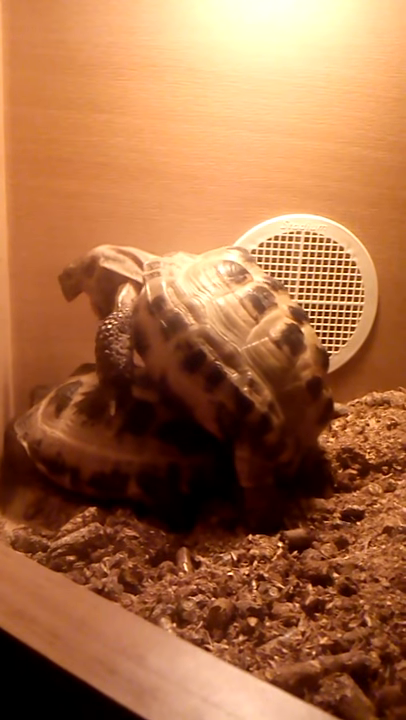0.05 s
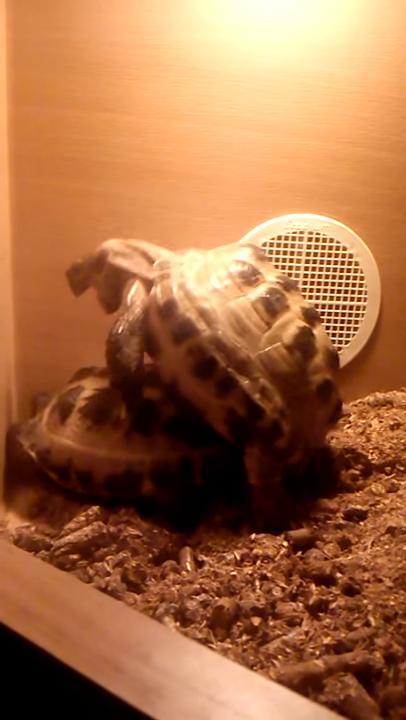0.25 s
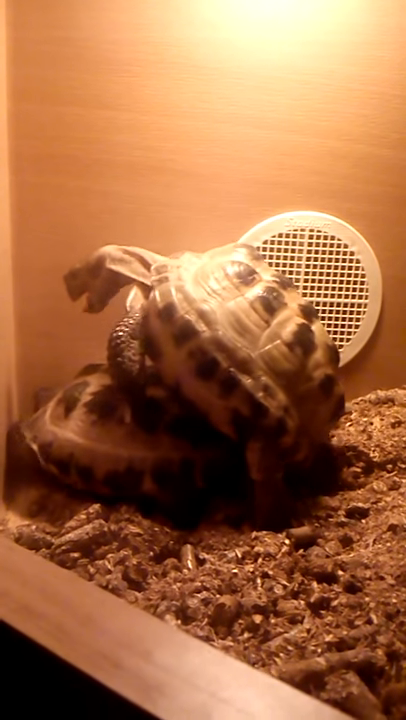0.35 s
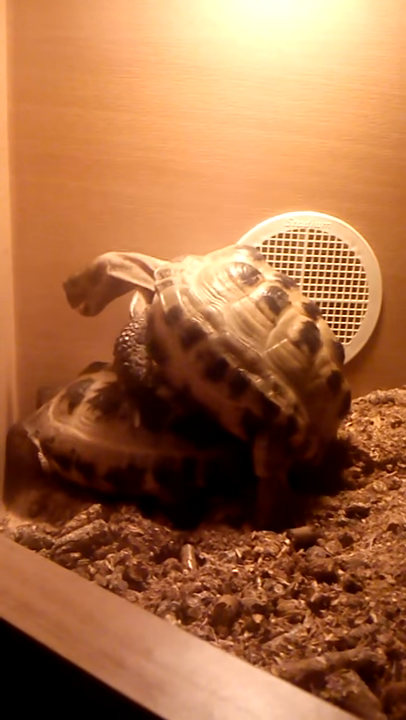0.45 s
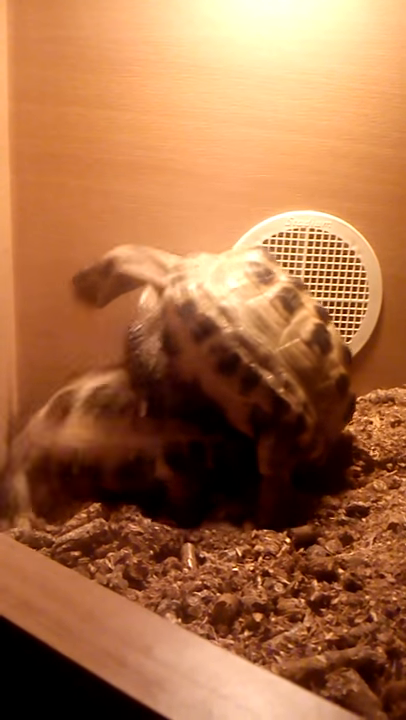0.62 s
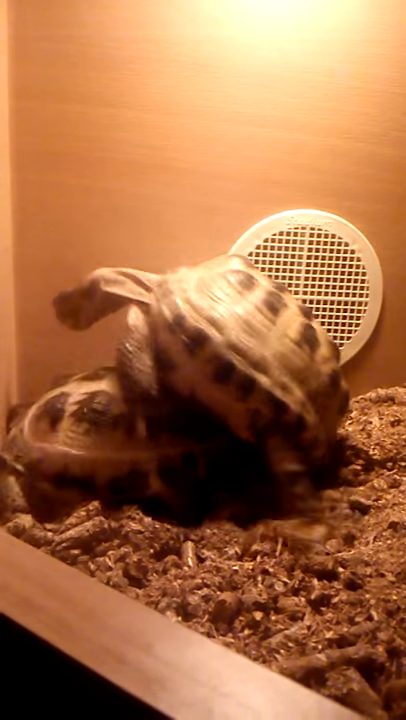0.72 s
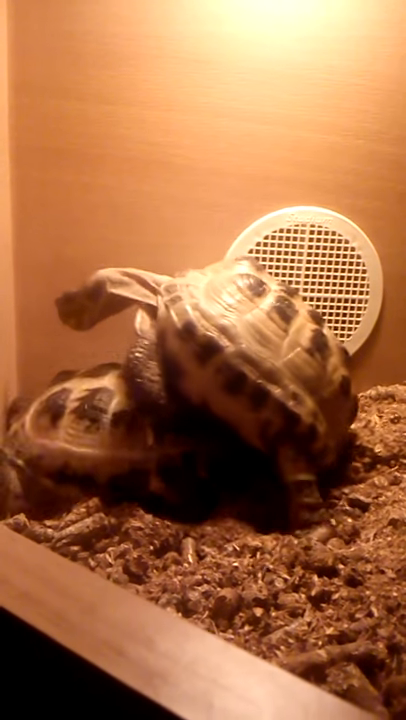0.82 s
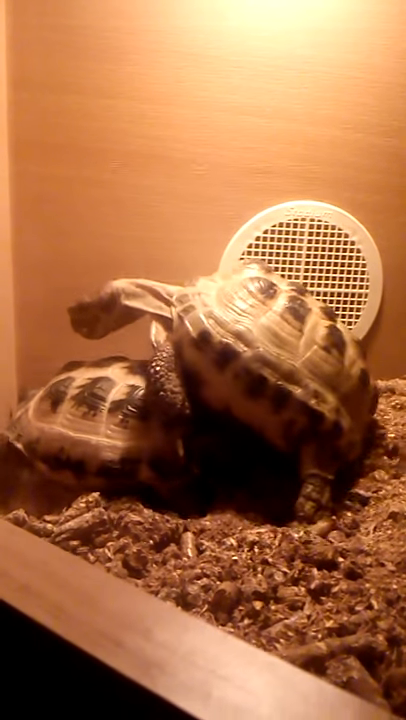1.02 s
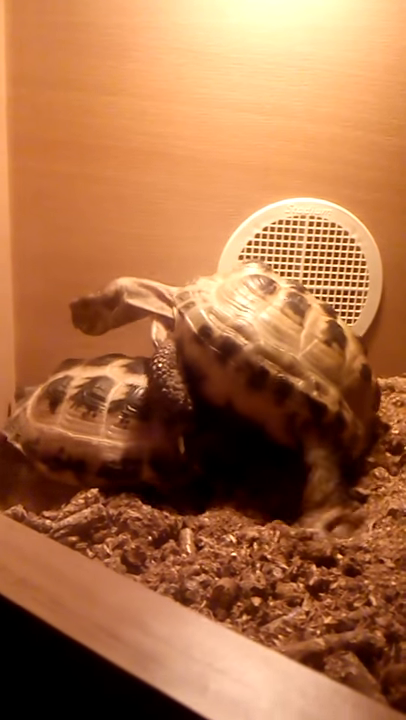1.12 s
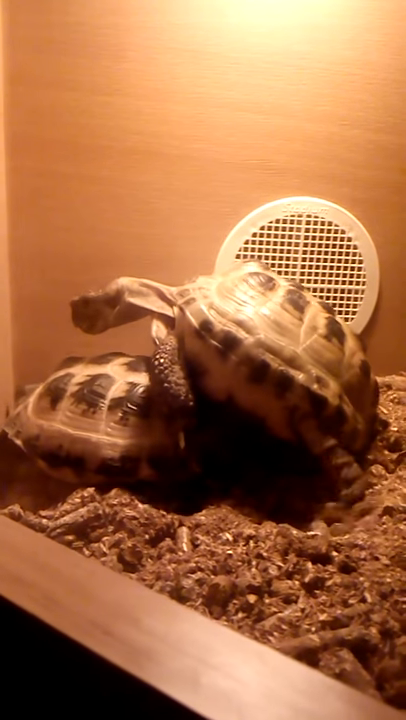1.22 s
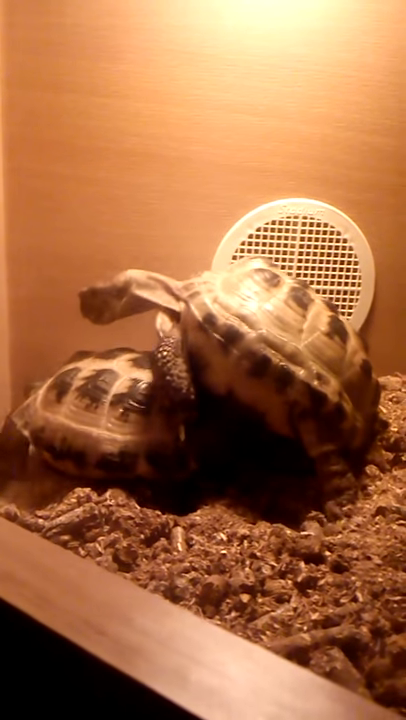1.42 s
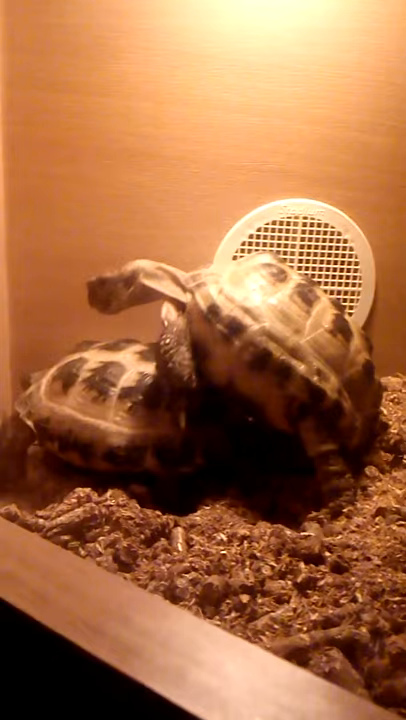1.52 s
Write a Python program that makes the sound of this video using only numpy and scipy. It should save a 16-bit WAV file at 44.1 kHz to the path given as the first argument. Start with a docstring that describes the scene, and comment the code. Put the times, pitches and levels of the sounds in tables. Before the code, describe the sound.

A scrape swells into a hard hollow shell knock, light ticks and rustles of bark chips follow, then a second scrape and slightly softer knock; heard close in a boxy wooden enclosure over faint low room noise.

```python
"""Tortoises shoving in a wooden enclosure

Two tortoises shove against each other in a hollow box lined with bark chips, over a quiet room hum.
Twice a shell scrapes up the other, clicks and thumps down; claws and chips tick and rustle between.
Room and hum are filtered noise, rustle is dense grains, contacts are decaying noise bursts, and the box
is a bank of damped modes, struck by thumps and driven by rubbing. A close microphone pair hears it."""
import sys
import numpy as np
from scipy import signal
from scipy.io import wavfile

SR = 44100
rng = np.random.default_rng(int(sys.argv[2]) if len(sys.argv) > 2 else 0)


def output_pcm(signal):
    """Save a mono or channel-first signal as 16-bit PCM at the path in sys.argv[1].

    Samples are clipped to [-1, 1] before scaling.
    """
    pcm = np.clip(np.atleast_2d(signal).T, -1, 1) * 32767
    wavfile.write(sys.argv[1], SR, np.round(pcm).astype(np.int16))


N = 68355  # samples

# Wavering hum, one narrow band a row: centre_hz, width_hz, level_db
HUM_BANDS = [(51.3, 11.3, -66), (95.1, 16.5, -70)]
# Room noise, relative spectral density: frequency_hz, density_db (per Hz)
ROOM_SPECTRUM = [(12, -37), (20, 2), (119, -4.5), (157, -7.5), (298, -6.5), (616, -10.5), (791, -25),
                 (885, -20), (1200, -19.5), (1630, -23), (2220, -23.5), (5560, -29.5), (15600, -35.5)]
# Left-right likeness of the room noise: frequency_hz, correlation (-1 to 1)
ROOM_CORRELATION = [(25, 0.4), (125, 0.35), (500, 0.66), (1500, 0), (5000, 0.22), (15000, 0)]
# Left-right balance of the room noise: frequency_hz, left_minus_right_db
ROOM_BALANCE = [(60, -8), (180, 1.5), (550, -0.5), (1650, 1), (4970, -1.5), (15000, 1)]
ROOM_DB = -59.5

# Left-right likeness of the close sources: frequency_hz, correlation (-1 to 1)
CLOSE_CORRELATION = [(40, 1), (100, 0.97), (340, 0.99), (500, 0.7), (850, 0.54), (1200, 0.18), (1750, 0.28),
                     (2300, -0.27), (3300, 0.42), (4400, -0.3), (5500, -0.13), (7000, 0.34), (8800, -0.27),
                     (11500, 0.4), (14500, -0.14)]
# Left-right balance of the close sources: frequency_hz, left_minus_right_db
CLOSE_BALANCE = [(60, 1.5), (200, 0.5), (400, 0), (700, -2.5), (1100, -3), (1500, 0.5), (2200, -4.5),
                 (2800, 3), (3500, -1.5), (4400, 6), (6500, -3.5), (8800, 8.5), (11000, 4.5), (14000, -7.5)]

# Scraping of shell and bark, relative levels: time_s, low_db, middle_db, treble_db
SCRAPE_LEVELS = [(0, -76, -104, -94), (0.088, -71, -72.5, -80), (0.148, -51.5, -61.5, -69.5),
                 (.185, -54.5, -59, -60.5), (0.213, -49.5, -50.5, -57.5), (.245, -59, -60, -61),
                 (.3, -41, -56, -71), (0.378, -64.5, -69.5, -81), (.456, -51.5, -61, -70),
                 (0.513, -57.5, -70.5, -63.5), (.54, -84, -59.5, -73.5), (.58, -86, -60.5, -72),
                 (.65, -59, -65.5, -75), (.76, -65, -70, -77.5), (.83, -82, -68, -77.5),
                 (.88, -69, -70.5, -75), (.92, -68, -68.5, -75), (.966, -80, -74, -82.5),
                 (1.07, -72, -65.5, -77), (1.102, -63, -57.5, -66), (1.145, -51, -58.5, -56.5),
                 (1.165, -48, -58.5, -56.5), (1.194, -44, -48, -62), (1.213, -49.5, -62.5, -59),
                 (1.25, -44, -60, -71), (1.32, -67, -70, -82), (1.46, -63, -72.5, -75),
                 (1.528, -66, -61.5, -68), (1.55, -85, -68.5, -60.5)]
# Rustle, relative spectral density: frequency_hz, density_db (per Hz)
RUSTLE_SPECTRUM = [(700, -16), (1200, -19.5), (1600, -14), (2200, -12), (2700, -13.5), (3400, -20.5),
                   (4500, -15.5), (5700, -15), (7000, -19), (9500, -15), (11500, -19), (13300, -15),
                   (14900, -11), (16000, -20)]
RUSTLE_GAIN_DB, TREBLE_FROM_HZ = 5.5, 5050
GRAINS_PER_S, GRAIN_SPREAD_DB = 4900, 3.0
LUMPY_DB, LUMPS_HZ = 1.2, 70  # flicker shared by all rustle bands
FLICKER_DB, FLICKER_HZ = 1.56, 17  # flicker of each rustle band alone

# Rubbing in the upper box modes, relative level: time_s, level_db
RUB_UPPER_LEVELS = [(0, -76), (.1, -67), (.14, -59.5), (.24, -57.5), (.36, -72), (.47, -58.5), (.6, -65),
                    (.72, -61.5), (.8, -67.5), (.95, -72), (1.05, -76), (1.11, -61), (1.155, -47.5),
                    (1.21, -51), (1.3, -68.5), (1.4, -76), (1.5, -62), (1.55, -70)]
RUB_DB, RUB_TILT_DB = -25.5, 4.5  # gain, dB per octave
RUB_CROSSOVER = 1  # share of the upper level gained per octave above 400 Hz

# Softer ticks and crunches of claws and chips, relative levels:
# start_s, crack_db, thump_db, crack_tilt_db_per_octave, thump_tilt_db_per_octave
TICK_CONTACTS = [(0.121, -56.5, -54, -0.5, 0.81), (0.397, -48, -62, 4, 0.71), (0.497, -47, -64, 1.5, 0.27),
                 (0.543, -59.5, -60.5, 1, 2), (0.571, -80, -69, -1, 2.2), (.578, -49, -89, -1, 1.3),
                 (.682, -61.5, -62.5, -7, -1.8), (0.718, -57.5, -61, -1, 1.5), (0.81, -67, -51.5, -5, 0.32),
                 (.909, -54.5, -53.5, -3.5, -0.7), (1.116, -53, -81, -8, 2), (1.528, -55, -80, 6, 0)]
# Shell contacts, relative levels: start_s, crack_db, thump_db, crack_tilt_db_per_octave,
# thump_tilt_db_per_octave, crack_peak_hz
SHELL_CONTACTS = [(0.2524, -31.5, -39, 2, 3, 4760), (0.2737, -31.5, -30, -3.5, 1.5, 3380),
                  (1.2227, -33, -41.5, -2, 3.5, 4400), (1.2536, -36.5, -35, -4.5, 2, 3040)]
# Crack, relative spectral density: frequency_hz, density_db (per Hz)
CRACK_SPECTRUM = [(500, -2.5), (900, 0), (1400, -6.5), (2200, 1.5), (2900, -3), (3400, -1), (3900, 0),
                  (4700, -2), (5600, 1), (7200, -12), (9400, -2), (11500, -10.5), (13500, -8.5),
                  (16000, -13)]
# Box echo of a crack: frequency_hz, t60_s
ECHO_T60 = [(500, 0.18), (2000, 0.14), (5000, 0.082), (15000, .04)]
ECHO_DB = -13
KNOCK_RISE_S, KNOCK_T60_S, TICK_RISE_S, TICK_T60_S = 0.00051, 0.013, 0.0036, 0.021
PEAK_DB, PEAK_OCTAVES, TICK_PEAK_HZ = 3, 0.34, 5120

# Modes of the hollow box and shells: frequency_hz, relative_level_db, t60_s, build_up_s
BOX_MODES = [(42, -14, 0.04, 0.0069), (82, -11, 0.21, 0.007), (97.4, -6, 0.21, 0.016),
             (196.4, -5, 0.15, 0.0013), (225.8, -6, 0.087, 0.0025), (262.7, -3, 0.065, 0.0018),
             (349, -13.5, 0.16, 0.009), (398.4, -11.5, 0.14, 0.009), (503.7, -10.5, 0.11, .08),
             (610.5, -13, 0.05, 0.0037), (807.4, -6.5, 0.062, 0.0011), (982, -21, 0.16, 0.00067),
             (1188.4, -10, 0.048, 0.00043), (1671, -15.5, 0.06, 0.00033), (2264, -19.5, 0.057, 0.003),
             (2840, -13.5, 0.043, 0.00033), (3330, -13, 0.034, 0.00081), (4690, -17, 0.019, 0.00054),
             (5800, -29, 0.015, 0.00063), (9500, -23, 0.0085, .0005)]
MODE_SPREAD_DB = 1.0  # chance variation of each mode at each contact

CUTOFF_HZ = 15750


def from_db(db):
    """Decibels are twenty times the logarithm of an amplitude ratio."""
    return 10 ** (np.asarray(db) / 20)


def rms_one(x):
    """Dividing by the root mean square gives unit power."""
    return x / np.sqrt(np.mean(x ** 2) + 1e-20)


def at_hz(points, hz):
    """A spectral curve is interpolated linearly over log frequency."""
    curve_hz, values = np.transpose(points)
    return np.interp(np.log(hz), np.log(curve_hz), values)


def at_time(times_s, values):
    """A level contour is interpolated linearly over time."""
    return np.interp(np.arange(N) / SR, times_s, values)


def drift(rate_hz):
    """Low-passed noise of unit rms wanders slowly."""
    step = 40  # samples between slow values
    pole = np.exp(-2 * np.pi * rate_hz * step / SR)
    noise = rng.standard_normal(N // step + 2002)
    slow = signal.lfilter([1], [1, -2 * pole, pole * pole], noise)[2000:]  # settled part
    return np.interp(np.arange(N) / step, np.arange(len(slow)), rms_one(slow))


def stereo(mid, side, hz, correlation=CLOSE_CORRELATION, balance=CLOSE_BALANCE):
    """Summing and differencing two signals sets the correlation of a pair; gains set its balance."""
    alike = at_hz(correlation, hz)
    sign = np.array([[1], [-1]])  # left, right
    pair = np.sqrt(1 + alike) * mid + np.sqrt(1 - alike) * side * sign
    return from_db(sign * at_hz(balance, hz) / 2) * pair / np.sqrt(2)


def banded(spectrum, source, gain, *pair):
    """A spectrum is a sum of fifth-octave bands: scaled to unit power, each then follows gain(hz)."""
    low_hz, top_hz = spectrum[0][0], 16500
    edges = np.geomspace(low_hz, top_hz, int(5 * np.log2(top_hz / low_hz)) + 1)
    out, power = 0, 0
    for k, (low, high) in enumerate(zip(edges, edges[1:])):
        band = signal.butter(2, [low, high], "band", fs=SR, output="sos")
        mid, side = signal.sosfilt(band, source[k % 2])  # neighbours use separate noise
        hz = np.sqrt(low * high)
        level = from_db(at_hz(spectrum, hz))
        power += level ** 2 * np.mean(mid ** 2)
        out = out + level * gain(hz) * stereo(mid, side, hz, *pair)
    return out / np.sqrt(power)


def clicks(times_s, db):
    """An impulse excites all frequencies equally; one stands at each time."""
    out = np.full(N, 1e-18)  # tiny floor keeps the filters fast
    out[(np.asarray(times_s) * SR).astype(int)] = from_db(db)
    return out


def fade(x, t60_s):
    """Exponential decay: each impulse falls 60 dB in t60_s."""
    return signal.lfilter([1], [1, -from_db(-60 / (t60_s * SR))], x)


def smooth(x, time_s):
    """A one-pole low-pass of this time constant rounds an onset."""
    pole = np.exp(-1 / (time_s * SR))
    return signal.lfilter([1 - pole], [1, -pole], x)


def ring(x, hz, decay):
    """A damped resonator: amplitude is multiplied by decay every sample."""
    w = 2 * np.pi * hz / SR
    return signal.lfilter([0, np.sin(w)], [1, -2 * decay * np.cos(w), decay * decay], x)


def hum():
    """Narrow-band noise wavers in amplitude and phase like an unsteady tone."""
    out = 0
    for hz, width_hz, db in HUM_BANDS:
        edges = [hz - width_hz / 2, hz + width_hz / 2]
        band = signal.butter(2, edges, "band", fs=SR, output="sos")
        tone = signal.sosfilt(band, rng.standard_normal(N + SR))[SR:]  # settled part
        out = out + from_db(db) * rms_one(tone)
    return out


def room():
    """Stationary noise shaped by a spectrum, with slow level drift in each band."""
    noise = rng.standard_normal((2, 2, N))

    def gain(hz):
        return from_db(1.2 * drift(2.3))

    return from_db(ROOM_DB) * banded(ROOM_SPECTRUM, noise, gain, ROOM_CORRELATION, ROOM_BALANCE)


def grains():
    """Stick-slip friction: dense uneven clicks of fibres catching and letting go."""
    shape = (2, 2, N)
    sizes = from_db(GRAIN_SPREAD_DB * np.minimum(rng.exponential(1, shape), 5))
    signs = rng.choice([-1, 1], shape)
    return sizes * signs * (rng.random(shape) < GRAINS_PER_S / SR) + 1e-18


def rustle(mid_db, treble_db):
    """Filtered friction grains follow the scraping levels, with shared and separate flicker."""
    together_db = LUMPY_DB * drift(LUMPS_HZ)

    def gain(hz):
        treble_share = np.clip(np.log2(hz / TREBLE_FROM_HZ) + 0.5, 0, 1)
        scrape_db = mid_db + treble_share * (treble_db - mid_db)
        return from_db(scrape_db + together_db + FLICKER_DB * drift(FLICKER_HZ))

    return from_db(RUSTLE_GAIN_DB) * banded(RUSTLE_SPECTRUM, grains(), gain)


def rubbed_box(low_db, upper_db):
    """Forced vibration: friction grains keep the box modes rumbling."""
    noise, out = grains(), 0
    for k, (hz, level_db, t60_s, _) in enumerate(BOX_MODES):
        upper_share = np.clip(RUB_CROSSOVER * np.log2(hz / 400), 0, 1)
        tilt_db = RUB_TILT_DB * np.log2(min(hz, 1000) / 400)
        rub = from_db(low_db + upper_share * (upper_db - low_db) + tilt_db)
        mid, side = ring(rub * rms_one(noise[k % 2]), hz, from_db(-60 / (t60_s * SR)))
        out = out + from_db(level_db) * stereo(mid, side, hz)
    return from_db(RUB_DB) * out


def cracks(rows, peak_hz, rise_s, t60_s):
    """Impact noise: a short burst with an echo that dies fastest in the treble."""
    times_s, db, _, tilt_db, *_ = np.transpose(rows)

    def gain(hz):
        peak_db = PEAK_DB * np.exp(-(np.log2(hz / peak_hz) / PEAK_OCTAVES) ** 2)
        hit = clicks(times_s, db + peak_db + tilt_db * np.log2(hz / 3000))
        echo = from_db(ECHO_DB) * fade(hit, at_hz(ECHO_T60, hz))
        return smooth(fade(hit, t60_s) + echo, rise_s)

    return banded(CRACK_SPECTRUM, rng.standard_normal((2, 2, N)), gain)


def struck_box(rows):
    """Free vibration: each thump sets the modes ringing, every one building up and then decaying."""
    times_s, _, db, _, tilt_db = np.transpose([row[:5] for row in rows])
    chance = rng.normal(0, 1, (len(times_s), len(BOX_MODES)))
    n = np.arange(SR // 10)
    out = 0
    for k, (hz, level_db, t60_s, build_s) in enumerate(BOX_MODES):
        tilted_db = db + level_db + tilt_db * np.log2(hz / 400)
        hit = -clicks(times_s, tilted_db + MODE_SPREAD_DB * chance[:, k])
        slow = from_db(-60 / (t60_s * SR))
        fast = slow * np.exp(-1 / (build_s * SR))
        struck = ring(hit, hz, slow) - ring(hit, hz, fast)  # the difference starts from silence
        struck = struck / np.max(slow ** n - fast ** n)  # envelope peak of one
        quarter_period = int(SR / hz / 4)
        out = out + stereo(struck, np.roll(struck, quarter_period), hz)
    return out


def scene():
    """Superposition: the sound pressures of all sources add."""
    times_s, *columns = np.transpose(SCRAPE_LEVELS)
    low_db, mid_db, treble_db = [at_time(times_s, column) for column in columns]
    upper_db = at_time(*np.transpose(RUB_UPPER_LEVELS))
    background = hum() + room()
    rubbing = rustle(mid_db, treble_db) + rubbed_box(low_db, upper_db)
    ticks = cracks(TICK_CONTACTS, TICK_PEAK_HZ, TICK_RISE_S, TICK_T60_S)
    shell_peak_hz = np.array(SHELL_CONTACTS)[:, -1]
    knocks = cracks(SHELL_CONTACTS, shell_peak_hz, KNOCK_RISE_S, KNOCK_T60_S)
    thumps = struck_box(SHELL_CONTACTS + TICK_CONTACTS)
    return background + rubbing + ticks + knocks + thumps


def record(dry):
    """A steep elliptic low-pass limits the bandwidth."""
    return signal.sosfilt(signal.ellip(12, 0.5, 60, CUTOFF_HZ, fs=SR, output="sos"), dry)


dry = scene()
out = record(dry)
output_pcm(out)
```